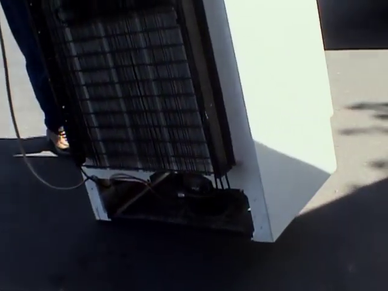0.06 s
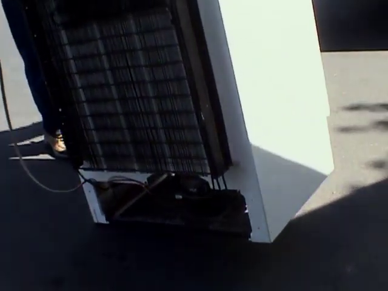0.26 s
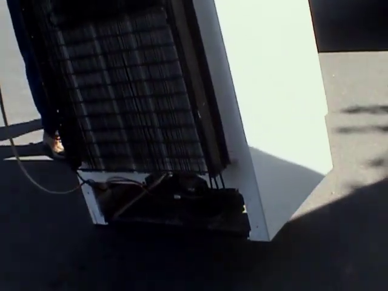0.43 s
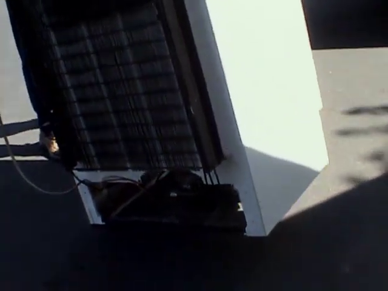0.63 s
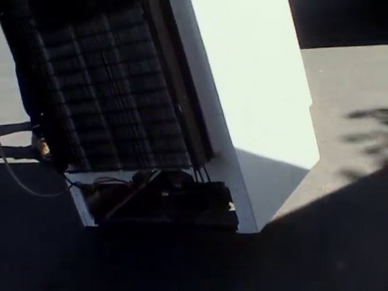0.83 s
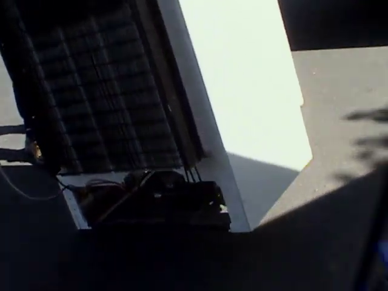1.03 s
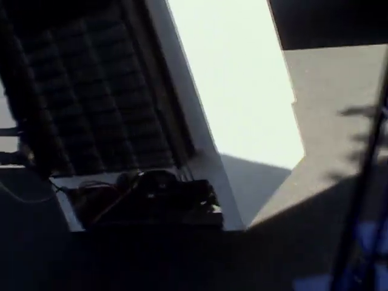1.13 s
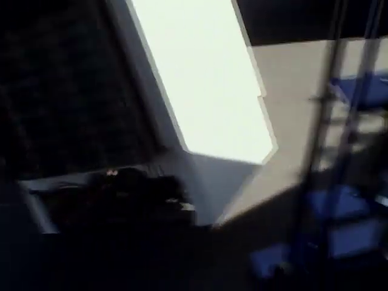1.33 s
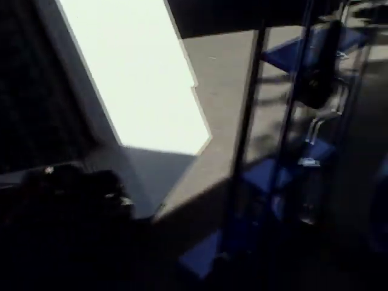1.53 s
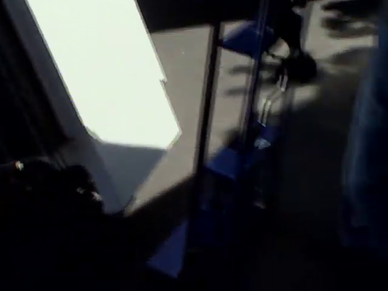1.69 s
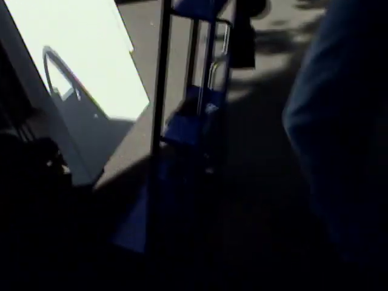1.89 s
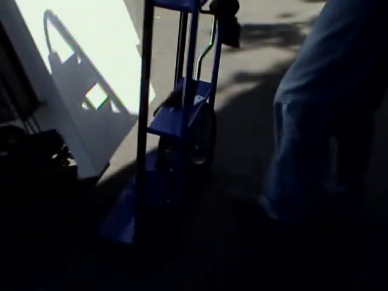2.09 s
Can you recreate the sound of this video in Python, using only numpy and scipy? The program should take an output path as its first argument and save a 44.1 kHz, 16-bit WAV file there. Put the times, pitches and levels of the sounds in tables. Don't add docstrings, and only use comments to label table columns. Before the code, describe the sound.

A steel hand truck scrapes and clanks over gritty pavement in three uneven pushes, close up outdoors

```python
import sys
import numpy as np
from scipy import signal
from scipy.fft import rfft, irfft
from scipy.io import wavfile

SR = 44100
rng = np.random.default_rng(int(sys.argv[2]) if len(sys.argv) > 2 else 0)


def digitize_waveform(pressure):
    field = np.atleast_2d(pressure).T
    bounded = np.clip(field, -1, 1)
    quanta = np.round(bounded * 32767).astype(np.int16)
    wavfile.write(sys.argv[1], SR, quanta)


def volts_from_decibels(level):
    exponent = np.asarray(level, float) / 20
    return 10 ** exponent


N = 94815

# time [s], scrape level [dB], extra push on the low modes [dB].
DRAGS = [
    [(0.25, -2, -12), (0.254, -15.5, -7.5), (0.466, -16.5, -1), (0.524, -24, 5), (0.62, -43.5, 8.5)],
    [(1.1, -32.5, 7), (1.128, -20, -2.5), (1.208, -17.5, -9), (1.264, -18.5, 2.5), (1.332, -18, -3.5),
     (1.522, -48, 18), (1.556, -39.5, -1), (1.622, -57, 5), (1.63, -45, 0)],
    [(1.63, -46, 4), (1.638, -32.5, 18), (1.666, -27, 3), (1.768, -32.5, 15), (1.796, -21.5, -11),
     (1.812, -26.5, 6), (1.864, -27.5, 7.5), (2.022, -55.5, 6.5), (2.03, -35, 0)],
]
# peak time [s], peak level [dB], extra low push [dB], length [s].
SKIPS = [
    (0.627, -17.5, 7.5, 0.022),
    (0.667, -23, 7.5, 0.021),
    (0.9193, -12, 4, 0.021),
    (1.0006, -17.5, 7.5, 0.025),
    (1.0497, -23.5, 16, 0.02),
    (1.072, -23, 16, 0.018),
    (1.5484, -30, 5, 0.019),
    (2.032, -23, -4, 0.022),
    (2.0572, -26.5, 6.5, 0.027),
    (2.0942, -24, 12.5, 0.024),
]
# pitch [Hz], width [Hz], level [dB].
FRAME = [(736.3, 39, 0.5), (1280, 110, 0.5), (2440, 63, -8), (2747, 29, -3.5), (3256, 150, 3),
         (4093, 110, 3.5), (4690, 96, -5.5), (5040, 33, -8.5), (5900, 39, -10.5), (6100, 28, -1.5),
         (6460, 69, -5.5), (7710, 25, -8), (8400, 72, -27), (8900, 92, -12)]
# pitch [Hz], level [dB per Hz].
PLATE = [(88, -61), (150, -43), (404, -7.5), (844, -4), (1290, -1.5), (2600, -6.5), (4840, -4.5),
         (8490, -10), (15500, -38.5)]
# start [s], peak level [dB], pitch [Hz], fall by 60 dB [s].
THUDS = [
    (0.2453, -9.5, 783, 0.043),
    (0.2471, -6.5, 1110, 0.041),
    (1.635, -23, 427, 0.075),
    (1.687, -19, 575, 0.066),
    (1.83, -14.5, 1322, 0.076),
    (2.101, -28, 1097, 0.066),
]
# pitch [Hz], level [dB], fall by 60 dB [s].
CLANK = [(916, -13, 0.43), (1287, -6, 0.22), (2126, -10, 5.0), (2966, -16, 0.23), (5910, -15.5, 0.3),
         (6800, -9, 0.16), (7200, -15, 0.29), (7200, -8, 0.22), (8070, 2, 0.17), (8538, -13, 0.21),
         (8880, 0, 0.16), (9485, -8, 0.28), (9685, -4, 0.12), (10650, -13, 0.24)]
# pitch [Hz], level [dB per Hz].
SPRAY = [(240, -55), (400, -24), (1080, -7.5), (1300, 3), (1490, -19), (2120, -5.5), (5150, -20),
         (8280, -8), (15500, -43)]
# brushed at [s], pitch [Hz], level [dB], fall by 60 dB [s].
TUBES = [
    (.86, 3208, -46.5, 0.76),
    (1.38, 5265, -31, 0.49),
    (1.51, 1313, -32.5, 0.56),
    (1.52, 2780, -42, 0.36),
    (2.035, 2650, -45, .3),
    (0.679, 1280, -36, .3),
]
# pitch [Hz], difference [dB].
LEAN = [(60, 1.0), (180, 8), (550, 1.5), (1650, -3), (4970, -8.5), (15000, -1.5)]
# time [s], share of the lean [1 = all].
PLACE = [
    (1.3, 0.83),
    (1.65, 0.5),
    (2.1, 0.4),
]
# time [s], level [dB].
WIND = [(0.0, -47.5), (0.07, -60), (0.11, -34), (0.15, -47), (0.19, -66), (0.23, -47), (0.43, -64.5),
        (0.6, -29.5), (0.74, -59), (0.8, -33), (0.86, -57), (0.93, -27.5), (1.14, -60), (1.55, -77),
        (1.98, -38), (2.02, -75), (2.04, -45.5), (2.15, -41.5)]
# pitch [Hz], level [dB per Hz].
WIND_COLOUR = [(12, -54), (20, -28), (98, 2), (151, 6), (595, -5), (698, -16), (900, -25), (1170, -53),
               (1980, -120)]
# pitch [Hz], level [dB per Hz].
STREET = [(35, -51), (60, -20.5), (216, -5), (464, 3), (546, 3.5), (4230, -20), (6130, -20.5), (8300, -27),
          (15600, -40.5)]

SECONDS = np.arange(N) / SR
OPPOSITE = np.array([[1], [-1]])


def rms_one(x):
    return x / np.sqrt(np.mean(x ** 2) + 1e-20)


def at_hz(points, hz):
    points_hz, db = np.transpose(points)
    return np.interp(np.log(hz), np.log(points_hz + 1), db)


def drift(per_s, count=1):
    knots = rng.standard_normal((count, 400))
    return 1.22 * np.array([np.interp(SECONDS * per_s, np.arange(400), k) for k in knots])


def ring(force, hz, t60):
    r = volts_from_decibels(-60 / (t60 * SR))
    w = 2 * np.pi * hz / SR
    return signal.lfilter([0, np.sin(w)], [1, -2 * r * np.cos(w), r * r], force + 1e-18)


def coloured(x, spectrum):
    hz = np.arange(N // 2 + 1) * SR / N + 1
    gain = volts_from_decibels(at_hz(spectrum, hz)) * (hz > spectrum[0][0])
    return rms_one(irfft(rfft(x) * gain, N))


def after(start, t60):
    t = SECONDS - start
    return (t >= 0) * volts_from_decibels(-60 * np.maximum(t, 0) / t60)


def placed(x, hz, extra_db=0):
    share = np.interp(SECONDS, *np.transpose(PLACE))
    half_db = (at_hz(LEAN, hz) + extra_db) * share / 2
    left, right = volts_from_decibels(half_db), volts_from_decibels(-half_db)
    return x * 2 * np.array([left, right]) / (left + right)


def contact():
    light, heavy = np.zeros(N), np.zeros(N)
    for rows in DRAGS:
        s, db, weight_db = np.transpose(rows)
        force = (SECONDS >= s[0]) * (SECONDS < s[-1]) * volts_from_decibels(np.interp(SECONDS, s, db))
        light += force
        heavy += force * volts_from_decibels(np.interp(SECONDS, s, weight_db))
    for s, db, weight_db, length in SKIPS:
        t = SECONDS - s
        rise = np.clip(t / 0.0025 + 0.5, 0, 1)
        fall = np.exp(-np.clip(t / length, 0, 5) ** 2) * (t < 0.2)
        force = volts_from_decibels(db - 12.5) * rise * fall
        light += force
        heavy += force * volts_from_decibels(weight_db)
    return light, heavy


def grit_clicks():
    per_s, spread_db, clump_db, clumps_per_s = 6000, 4, 2, 40
    sizes_db = spread_db * np.minimum(rng.exponential(1, (6, N)), 5)
    sizes = volts_from_decibels(sizes_db) * rng.choice([-1, 1], (6, N))
    slips = rng.random((6, N)) < per_s / SR
    return rms_one(sizes * slips * volts_from_decibels(clump_db * drift(clumps_per_s)))


def plate_modes():
    spread_db, wander_db, lean_spread_db = 5.5, 3.5, 4.5
    pitches = np.geomspace(180, 14000, 131)[:130]
    detune, uneven, side = rng.standard_normal((3, 130))
    gains = volts_from_decibels(at_hz(PLATE, pitches) + 10 * np.log10(pitches / 2000) + spread_db * uneven)
    gains = gains / np.sqrt(np.sum(gains ** 2))
    t60s = np.minimum(107 / pitches * 4, 0.13)
    return [(hz * (1 + 0.01197 * d), gain, t60, wander_db, lean_spread_db * lean)
            for hz, d, gain, t60, lean in zip(pitches, detune, gains, t60s, side)]


def frame_modes():
    level_db, wander_db, narrowing = -6, 3.5, 0.41
    norm = np.sqrt(sum(volts_from_decibels(db) ** 2 for _, _, db in FRAME))
    return [(hz, volts_from_decibels(db + level_db) / norm, 2.16 / (width * narrowing), wander_db, 0)
            for hz, width, db in FRAME]


def scrape():
    light, heavy = contact()
    grit = grit_clicks()
    sway = drift(8.94, count=20)
    out = np.zeros((2, N))
    for k, (hz, gain, t60, wander_db, lean_db) in enumerate(plate_modes() + frame_modes()):
        low = 1 / (1 + (hz / 1700) ** 4)
        push = low * heavy + (1 - low) * light
        force = grit[k % 6] * push * volts_from_decibels(wander_db * sway[k % 20])
        steady = np.sqrt(4 * np.log(1000) / (t60 * SR))
        out += placed(gain * steady * ring(force, hz, t60), hz, lean_db)
    rasp = volts_from_decibels(-2) * light * coloured(grit[:3].sum(axis=0), PLATE)
    return out + placed(rasp, 3300)


def thuds():
    out = np.zeros((2, N))
    for s, db, hz, t60 in THUDS:
        knock = np.zeros(N)
        start = int(s * SR)
        knock[start:start + 20] = volts_from_decibels(db) * np.hanning(20) / 7
        out += placed(ring(knock, hz, t60) + 0.5 * ring(knock, hz * 1.37, t60), hz)
    return out


def clank():
    start, chatter_t60, longest_t60 = 0.7247, 0.013, 0.44
    out = np.zeros((2, N))
    for hz, db, t60 in CLANK:
        chatter = volts_from_decibels(-18 + db - 14.5) * rng.standard_normal(N) * after(start, chatter_t60)
        out += placed(ring(chatter, hz, min(t60, longest_t60)), hz)
    fall = volts_from_decibels(-24.5) * after(start, 0.16) + volts_from_decibels(-21.5) * after(start, 0.47)
    spray = fall * coloured(rng.standard_normal(N), SPRAY)
    return out + placed(spray, 6500)


def tubes():
    out = np.zeros((2, N))
    for s, hz, db, t60 in TUBES:
        brush = volts_from_decibels(db - 15.5) * rng.standard_normal(N) * after(s, 0.093)
        out += placed(ring(brush, hz, t60), hz)
    return out


def echoes(x):
    n, t60, level_db, cut_hz = SR // 2, 0.36, -14.5, 8300
    late = np.arange(n) > 200
    tail = rng.standard_normal((2, n)) * volts_from_decibels(-60 * np.arange(n) / SR / t60) * late
    tail = signal.sosfilt(signal.butter(1, cut_hz, fs=SR, output="sos"), tail)
    tail = rms_one(tail) / np.sqrt(n)
    return volts_from_decibels(level_db) * signal.fftconvolve(x.mean(axis=0)[None], tail, axes=1)[:, :N]


def wind():
    puffs_db = np.interp(SECONDS, *np.transpose(WIND)) + 10
    gust = volts_from_decibels(puffs_db - 4.5 * drift(35.07)[0])
    mid, side = (coloured(v, WIND_COLOUR) for v in rng.standard_normal((2, N)))
    return gust * (volts_from_decibels(-8) * mid + side * OPPOSITE)


def traffic():
    mid, side = (coloured(v, STREET) for v in rng.standard_normal((2, N)))
    return volts_from_decibels(-45.5) * (mid + volts_from_decibels(-12) * side * OPPOSITE)


def insects():
    hz, width_hz = 6200, 470
    return volts_from_decibels(-59) * rms_one(ring(rng.standard_normal((2, N)), hz, 1.8 / width_hz))


def scene():
    truck = scrape() + thuds() + clank() + tubes()
    return truck + echoes(truck) + wind() + traffic() + insects()


def low_pass(x):
    return signal.sosfilt(signal.butter(12, 15700, fs=SR, output="sos"), x)


def record(dry):
    top = 0.98
    mix = top * np.tanh(dry / top)
    return low_pass(mix)


dry = scene()
out = record(dry)
digitize_waveform(out)
```